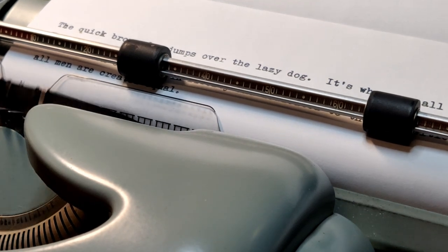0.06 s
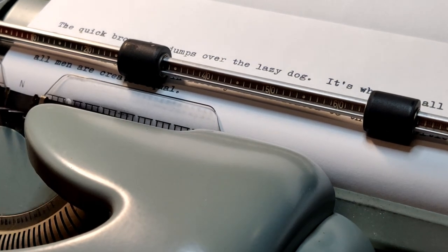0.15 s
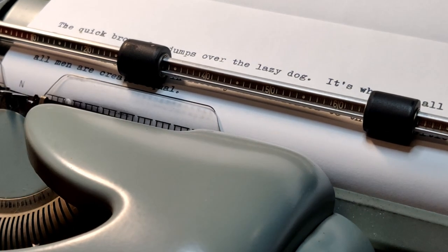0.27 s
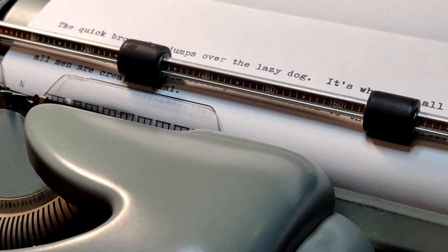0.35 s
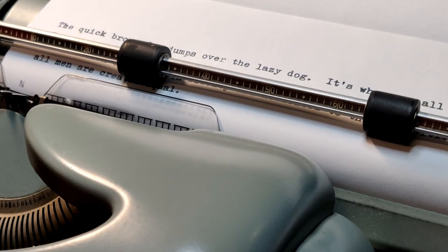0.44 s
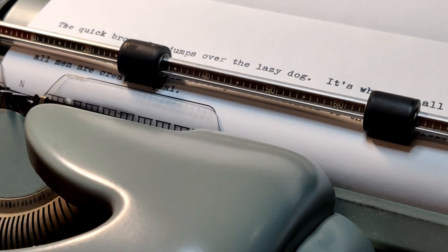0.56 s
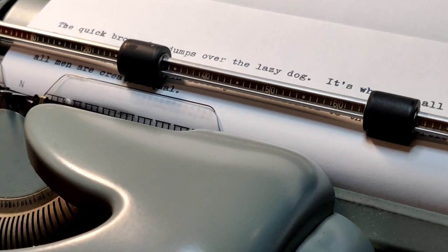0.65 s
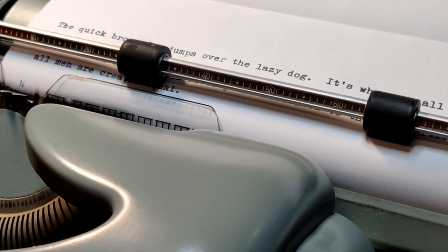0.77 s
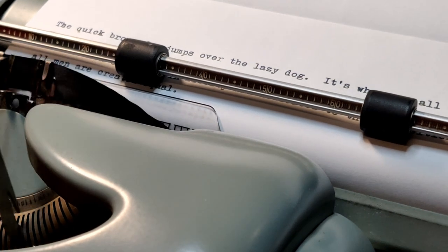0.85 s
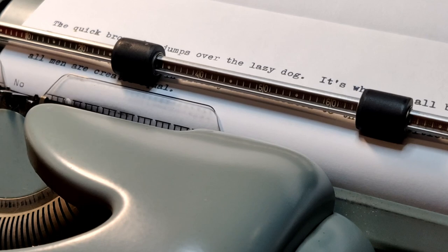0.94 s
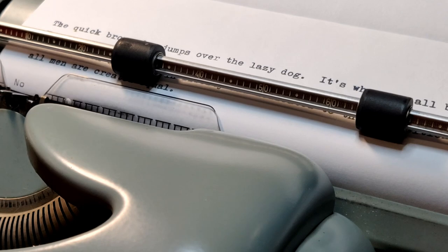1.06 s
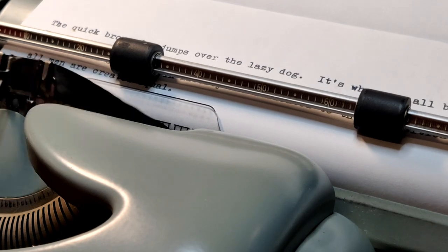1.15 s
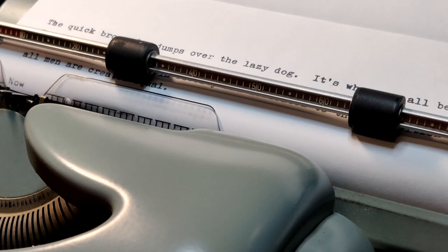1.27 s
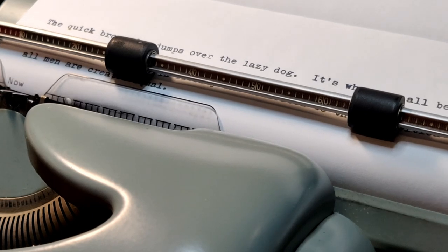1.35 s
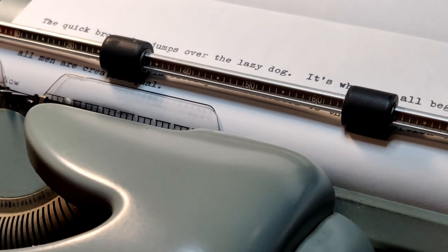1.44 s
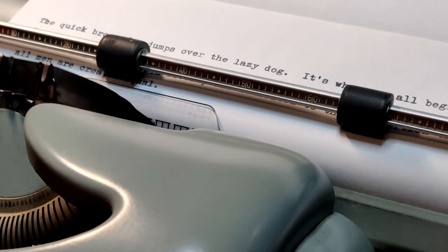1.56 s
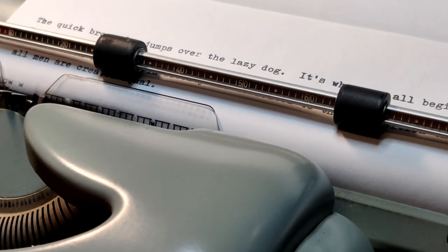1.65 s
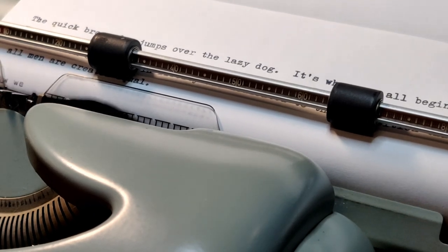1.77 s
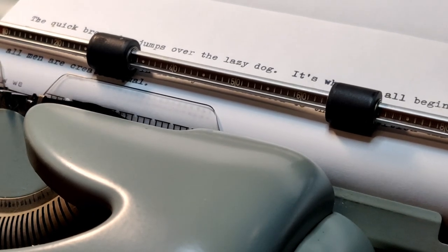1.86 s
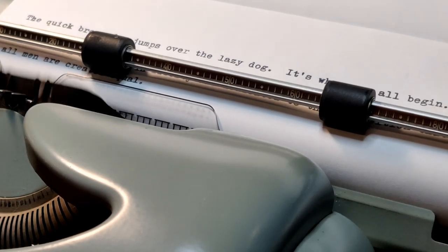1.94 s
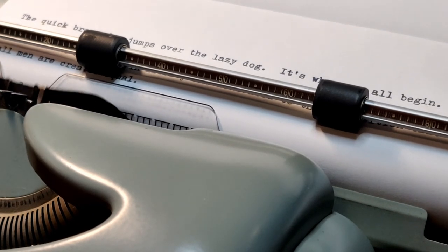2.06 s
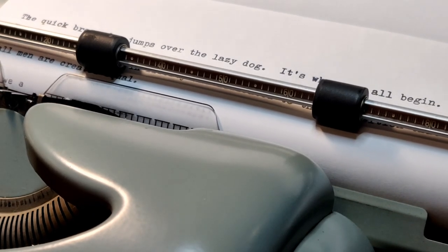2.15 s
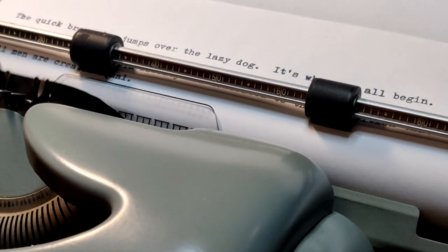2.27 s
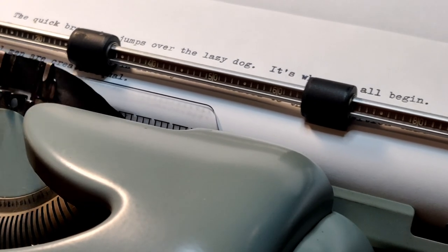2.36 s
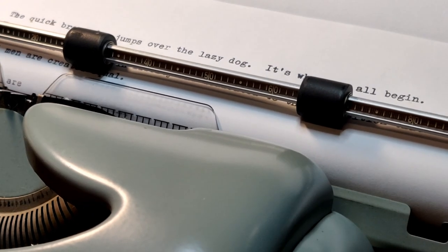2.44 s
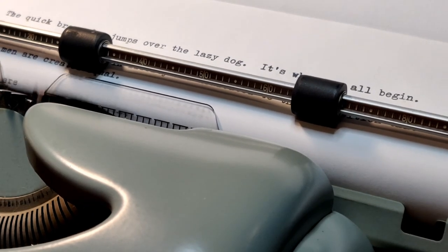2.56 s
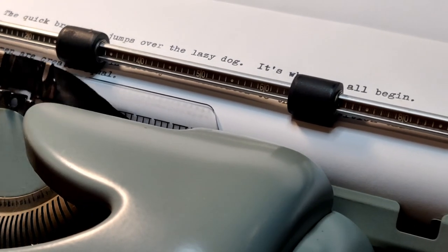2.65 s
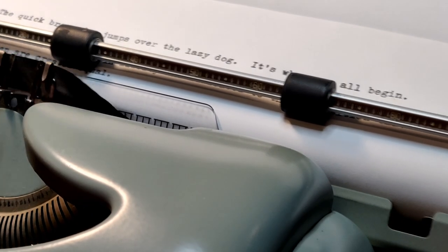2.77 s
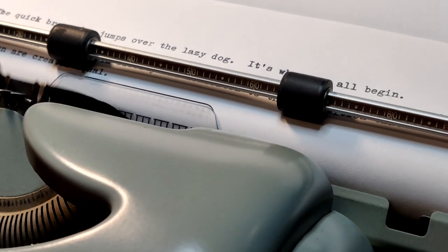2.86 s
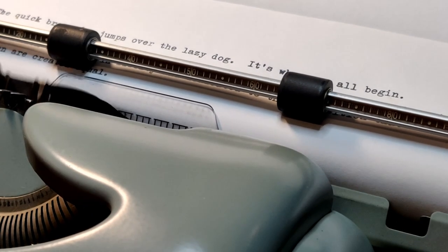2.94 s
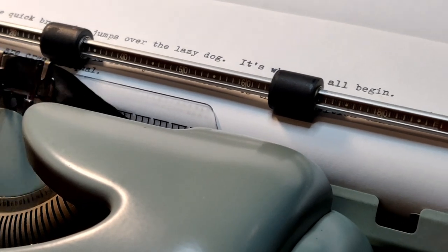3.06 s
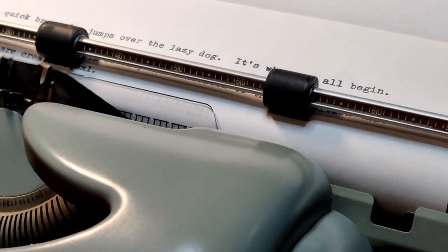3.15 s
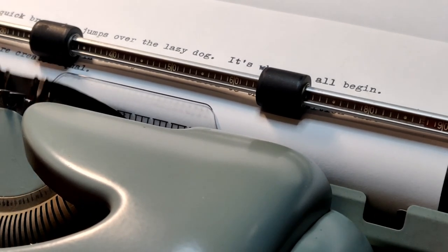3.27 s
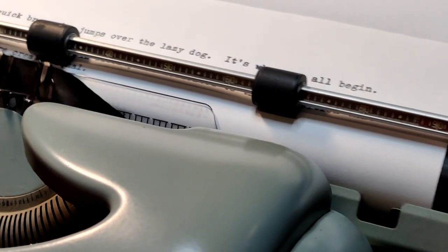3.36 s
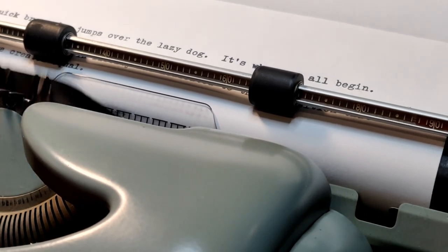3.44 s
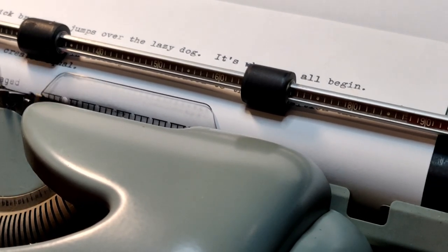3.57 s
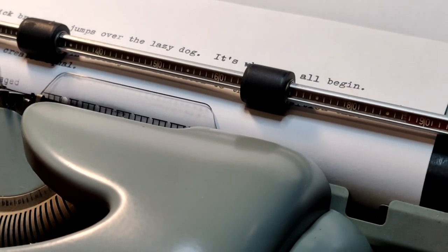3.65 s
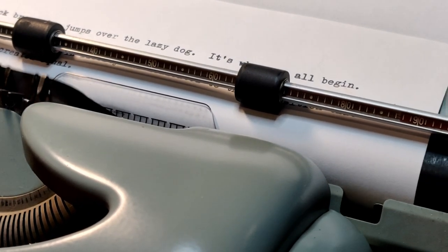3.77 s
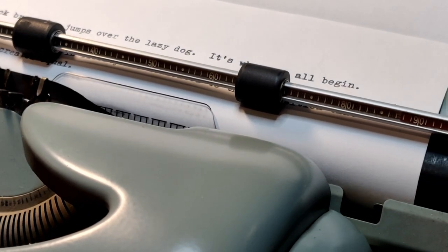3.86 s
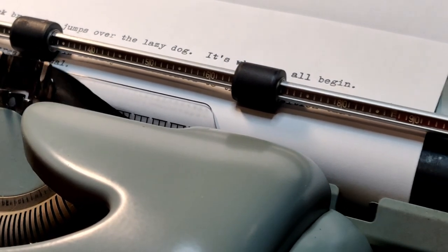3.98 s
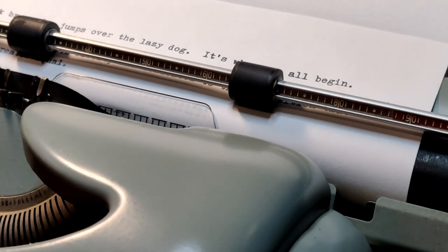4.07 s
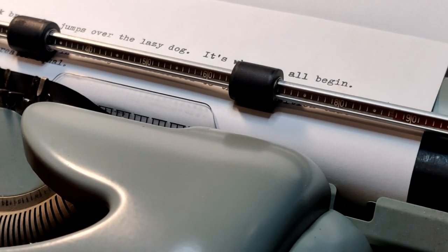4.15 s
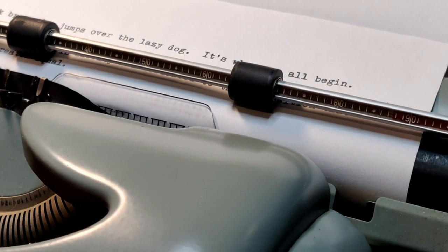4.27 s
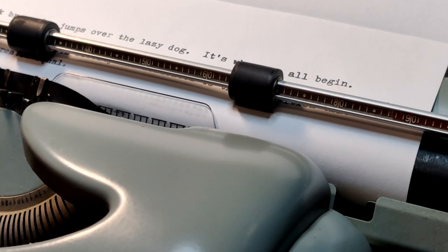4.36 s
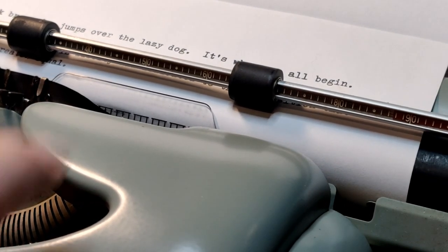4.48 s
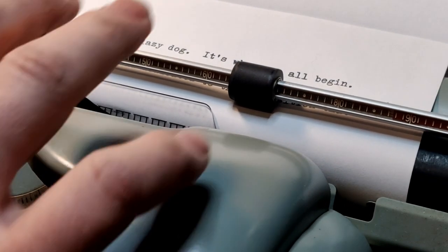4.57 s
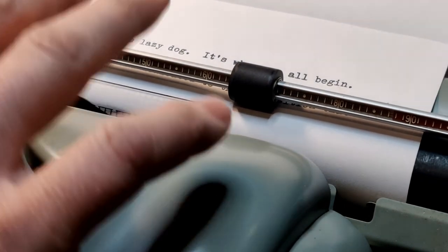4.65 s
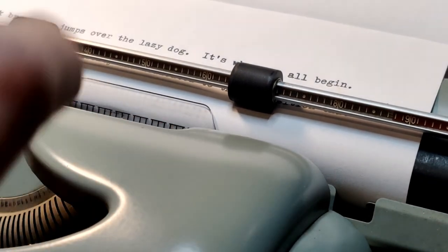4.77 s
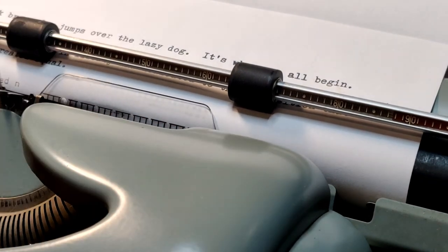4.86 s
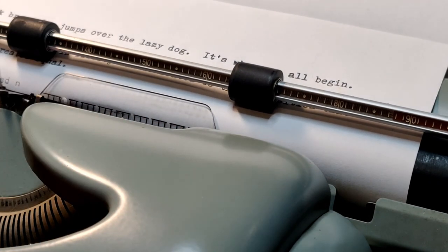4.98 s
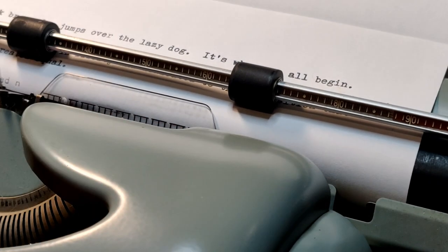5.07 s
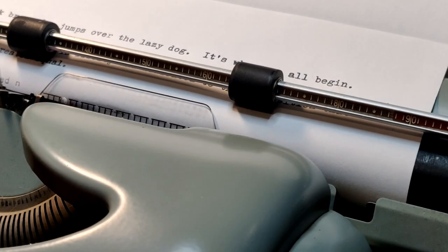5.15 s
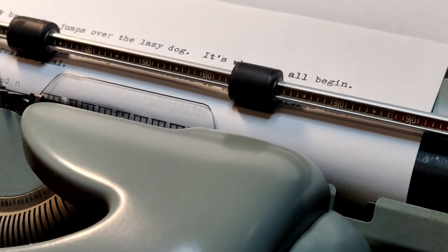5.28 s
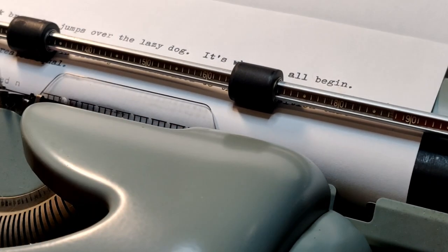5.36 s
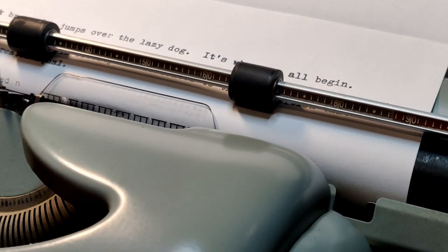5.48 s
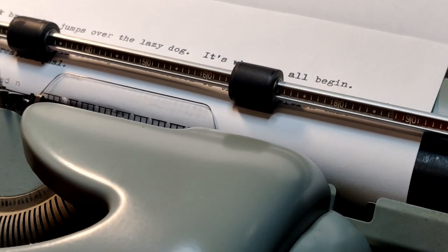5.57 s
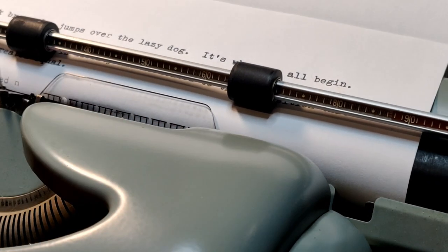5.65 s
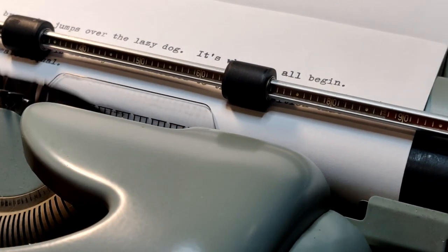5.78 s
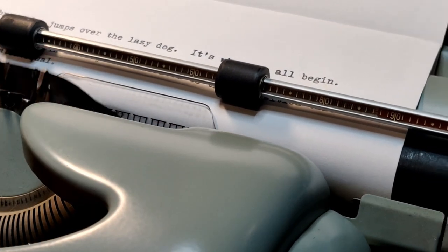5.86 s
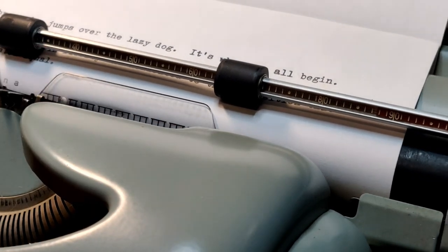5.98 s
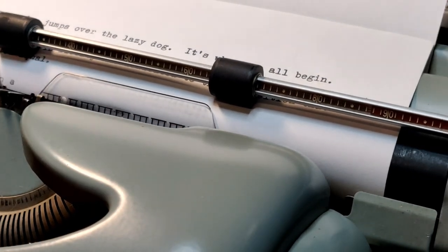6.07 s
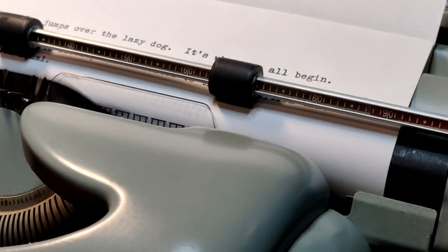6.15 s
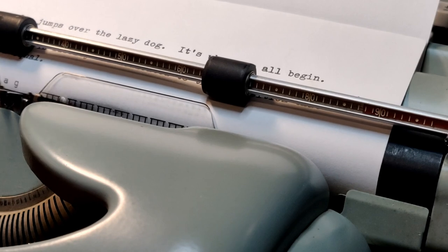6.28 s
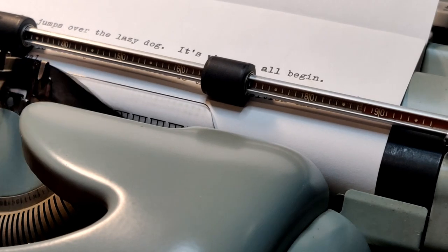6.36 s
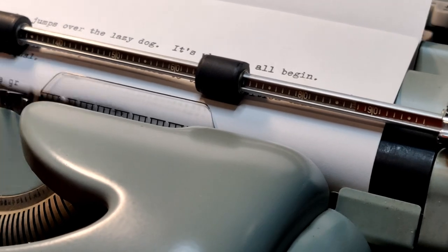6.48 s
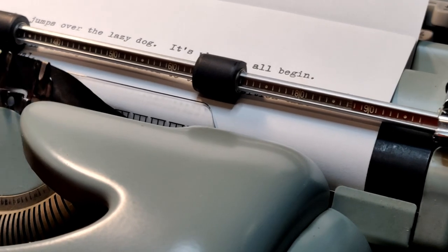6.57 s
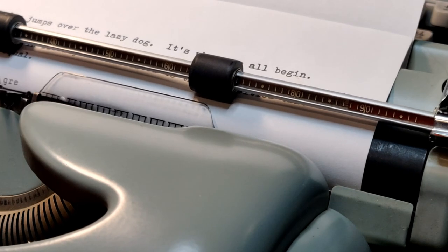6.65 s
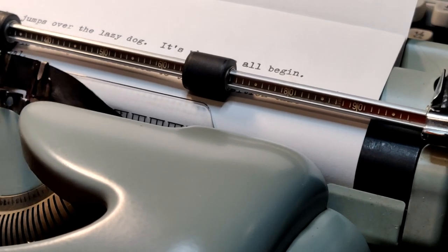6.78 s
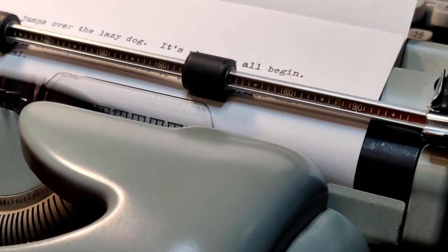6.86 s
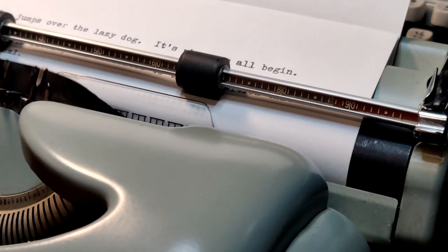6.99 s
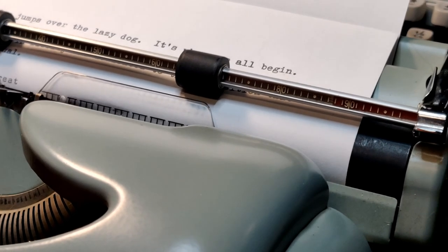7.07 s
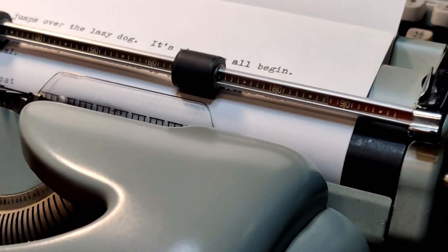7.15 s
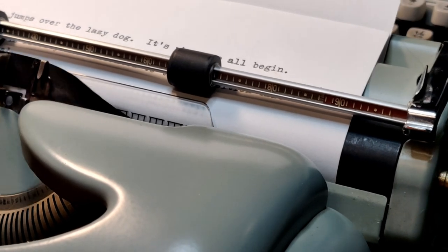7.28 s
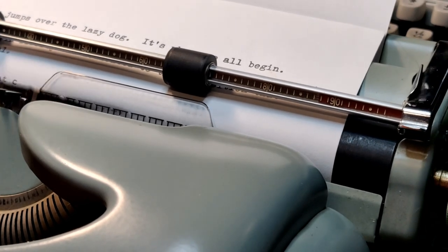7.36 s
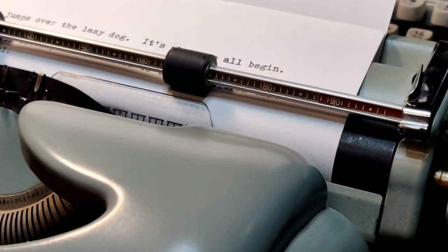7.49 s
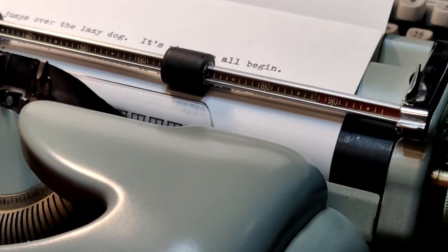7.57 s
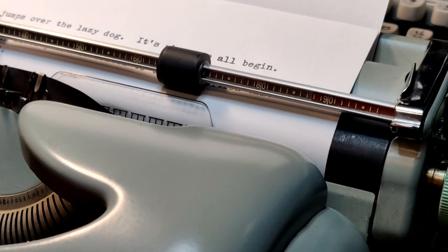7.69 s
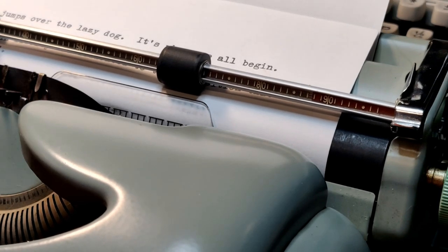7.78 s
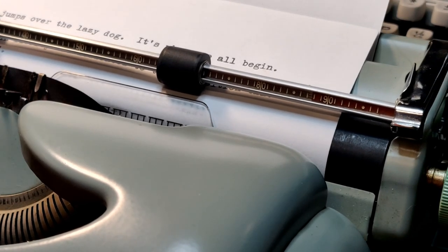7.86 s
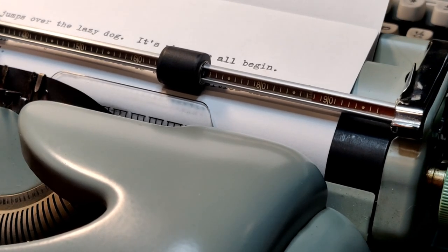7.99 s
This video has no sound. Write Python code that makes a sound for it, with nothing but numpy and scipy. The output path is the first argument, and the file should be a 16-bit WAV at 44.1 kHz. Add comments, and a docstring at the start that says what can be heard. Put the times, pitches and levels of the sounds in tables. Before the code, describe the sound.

Close up, a manual typewriter clatters in quick uneven runs of sharp metallic keystrokes, pauses briefly with small clicks, then resumes in a quiet room.

```python
"""A manual typewriter on a desk in a quiet room, with a two-port microphone close by.
From the start keys go down, type slugs slap the platen, type bars fall back and the carriage steps on;
the space bar knocks the ringing frame, linkages jingle and the desk thuds under each blow.
After four seconds typing pauses, leaving a few small clicks and a faint tone; then it resumes to the end.
Filtered noise bursts and dying sines make each blow; near surfaces, a far wall and the room answer."""
import sys
import numpy as np
from scipy import signal
from scipy.fft import rfft, irfft, next_fast_len
from scipy.io import wavfile
from scipy.ndimage import uniform_filter1d

SR = 44100
rng = np.random.default_rng(int(sys.argv[2]) if len(sys.argv) > 2 else 0)


def store_pcm(level_fs):
    """Save levels as 16-bit WAV."""
    pcm = np.round(np.clip(level_fs, -1, 1) * 32767).astype(np.int16)
    wavfile.write(sys.argv[1], SR, np.atleast_2d(pcm).T)


N = 353902  # samples

# Levels in the event tables are relative within their own sound path.
# type slugs on the platen: start_s, slap_db, jingle_db, boom_db
STRIKES = [(0.0454, -15, -16, -31.5), (0.8602, -13, -14.5, -35.5), (1.1618, -14.5, -18.5, -43),
           (1.574, -16, -21.5, -37), (1.7274, -16, -22, -43), (2.0111, -14.5, -17.5, -28),
           (2.2386, -13, -19, -41), (2.3545, -13, -18.5, -35), (2.6555, -14, -20, -47.5),
           (2.8033, -14.5, -25, -36), (3.019, -14.5, -20.5, -43), (3.1143, -16.5, -20, -32),
           (3.2454, -16, -21.5, -36.5), (3.3679, -16, -26, -43), (3.5082, -17, -22, -39),
           (3.9645, -18.5, -21, -39), (5.8464, -16, -21.5, -47), (6.2097, -15, -21, -53),
           (6.42, -15, -21, -51), (6.5761, -16, -25, -55), (6.7786, -16, -19, -41.5),
           (6.956, -15.5, -22.5, -48.5), (7.3007, -13.5, -18, -46), (7.5935, -13.5, -20, -42)]
# space bar knocks: start_s, clack_db, frame_db, jingle_db, desk_db
SPACES = [(1.3373, -15, -30, -25, -33), (1.8588, -14, -22.5, -23.5, -31), (2.4746, -14, -21.5, -19.5, -28),
          (3.6206, -14.5, -22.5, -25.5, -29), (5.652, -12, -23, -20.5, -34),
          (5.9529, -13.5, -22.5, -20.5, -31), (7.0865, -13.5, -22, -26, -34)]
# other small clicks and knocks: start_s, click_db, jingle_db, frame_db, panel_db, boom_db
CLICKS = [(0.302, -57, -48, -56, -44, -35), (0.316, -49, -30, -48, -39, -34),
          (1.322, -35, -46, -35.5, -47, -43), (2.336, -33.5, -32, -45, -48, -47),
          (3.738, -40.5, -22, -45, -46, -50), (3.955, -37.5, -22, -44, -50, -51),
          (4.6865, -59, -58, -70, -62, -62), (4.7064, -49.5, -55, -79, -60, -53),
          (4.7356, -46, -30, -47, -28, -34.5), (5.639, -46.5, -36, -42, -45, -47),
          (7.483, -59, -42, -53, -45, -47.5), (7.524, -51.5, -38, -53, -60, -43)]
# keys going down, ahead of their strikes: start_s, level_db
PRESSES = [(0.0127, -26), (0.818, -33), (1.122, -42), (1.533, -37), (1.688, -30), (1.971, -34),
           (2.192, -46), (2.62, -28.5), (2.7635, -36), (2.978, -28.5), (3.059, -34), (3.21, -37),
           (3.3255, -31), (3.927, -38), (6.172, -25.5), (6.375, -47), (6.531, -30.5), (6.739, -36.5),
           (6.9075, -38), (7.261, -28.5), (7.559, -46)]
# carriage stepping on after a strike: start_s, level_db
STEPS = [(0.105, -35), (0.931, -31), (1.255, -31.5), (1.651, -35.5), (1.795, -38), (2.079, -33.5),
         (2.306, -31.5), (2.422, -30.5), (2.724, -33.5), (2.853, -34.5), (3.067, -32.5), (3.185, -41.5),
         (3.275, -32.5), (3.405, -34), (3.578, -41), (4.045, -30.5), (5.915, -38), (6.245, -34),
         (6.49, -44.5), (6.65, -39.5), (6.827, -34.5), (7.004, -33), (7.345, -32), (7.667, -32)]
# type bars falling back on their rest: start_s, level_db
FALLS = [(0.145, -26.5), (0.995, -23.5), (1.287, -26), (1.833, -24.5), (2.148, -26), (2.46, -24),
         (2.775, -24), (2.917, -28.5), (3.346, -32), (3.447, -22.5), (3.603, -33), (4.087, -36),
         (6.324, -26.5), (6.688, -25.5), (7.074, -33), (7.418, -19), (7.715, -39.5)]
# space bar coming back up, one for each knock: start_s, level_db
RETURNS = [(1.441, -33.5), (1.974, -34.5), (2.597, -33), (3.711, -31.5), (5.7444, -31.5), (6.056, -32.5),
           (7.192, -31.5)]

# how each small move sounds, over its own level: click_db, jingle_db, frame_db, panel_db, boom_db
PRESS_VOICE = (-11.5, 4, -21, -8, -11.5)
FALL_VOICE = (-17.5, 0.5, -26.5, -9.5, -12)
STEP_VOICE = (-13.5, -21, -15.5, -1.5, 2)
RETURN_VOICE = (-18, -2.5, -7, -8, -6)
# the ribbon lifting just ahead of the slug, over the slap: same columns
LIFT_VOICE = (-21.5, -10.5, -31, -44, -43.5)
# the returned space bar landing again, over the return: same columns
SETTLE_VOICE = (-30, -9, -21, 1, -4.5)
LIFT_LEAD_S, SETTLE_LAG_S = .011, .022

# spectrum of a slug's slap: pitch_hz, relative level_db (per hertz)
SLAP_SPECTRUM = [(290, -28), (600, -11.5), (1200, -13), (2200, -0.5), (3300, -8), (5200, -3.5), (7300, -9),
                 (9000, -5.5), (12000, -14), (16000, -31)]
# spectrum of the space bar's clack: pitch_hz, relative level_db (per hertz)
CLACK_SPECTRUM = [(760, -18), (1300, 6.5), (1890, -7), (2920, -1), (3970, -7), (5550, -3.5), (6030, 2),
                  (7260, -16), (12000, -14), (15600, -46.5), (22000, -120)]
# spectrum of clicking steel: pitch_hz, relative level_db (per hertz)
STEEL_SPECTRUM = [(760, -14), (1300, -12), (1730, -5.5), (2890, -3), (3360, -1.5), (5290, -4.5), (6200, 4),
                  (7060, -7), (12000, -6.5), (15600, -36.5), (22000, -120)]
# spectrum of jingling parts: pitch_hz, relative level_db (per hertz)
JINGLE_SPECTRUM = [(9000, -42), (11000, -27.5), (13000, -3.5), (14500, -1.5), (16200, 2.5)]
# ringing frame, undamped: pitch_hz, relative level_db, t60_s
FRAME_MODES = [(455, -20, 0.5), (518.4, 0.5, 0.098), (762, -1, 0.038), (822, -1, 0.11), (945, -9.5, 0.17),
               (1095, 3, 0.062), (1345, -10, 0.056), (1607, -10.5, 0.1), (1930, -13.5, 0.17)]
# ringing desk panel: pitch_hz, relative level_db, t60_s
PANEL_MODES = [(196, -14.5, 0.18), (228.5, 1.5, 0.11), (243.6, -3.5, 0.19), (306, -7, 0.1)]
# low boom of the desk: pitch_hz, relative level_db, t60_s
BOOM_MODES = [(56, -17, 0.099), (79.9, -4.5, 0.063), (86, 8, 0.23), (92.8, 11.5, 0.19), (130, -10, 0.15)]
# carriage parts that sing as the space bar returns: pitch_hz, width_hz, relative level_db
CARRIAGE_MODES = [(3900, 74, -18), (4680, 36, -12.5), (5620, 42, 2), (6880, 87, -23.5), (8900, 32, -8.5),
                  (9820, 180, -1), (10500, 61, 4), (13400, 140, -6), (14000, 85, -24.5), (14300, 110, -9),
                  (15100, 36, -1.5), (15600, 530, -8)]

# Linkage rattle levels, each as steel_db, jingle_db:
# type bar rising
SWINGING = (-52, -44)
# key held down
HELD = (-51.5, -44.5)
# type bar fallen back, over its share of the fall's level
FALLEN = (-35, -27.5)
# space bar down
SPACED = (-54.5, -58)
# carriage sliding on after the space bar
STEPPING = (-51.5, -48)
# after one of the other small clicks, over its click and jingle
NUDGED = (-9, -13.5)
# decay of the rattle: steel t60_s, jingle t60_s
RATTLE_T60 = 0.28, .2
SWING_S, HOLD_S, SLIDE_S = .04, .077, .12  # key down to strike; strike to key release; carriage slide
FALL_SHARE = .61  # dB of rattle for each dB of a harder fall

# reflections from close surfaces: delay_s of each
ECHO_DELAYS = .00319, .00377, .00434
# the same reflections: left gain, right gain
ECHO_GAINS = [(-.2, -.1), (.85, .7), (0, -.2)]
FAR_WALL_DELAY_S, FAR_WALL_DB = .0362, -16
# room tail by band: pitch_hz, t60_s, level_db
ROOM_BANDS = [(100, .25, -14), (300, .22, -12), (600, .2, -17), (1300, .18, -2), (5000, .15, -1.5),
              (9000, .12, -1.5), (15000, .1, -10)]

# faint tone: start_s, level_db before wavering
WHINE_LEVEL = [(3.6, -93), (4.1, -77.5), (5.7, -78.5), (6.2, -88)]
# spectrum of the steady room noise: pitch_hz, relative level_db (per hertz)
FLOOR_SPECTRUM = [(25, 7), (70, 4.5), (156, -11.5), (334, -8.5), (404, -22), (900, -21), (1400, -24),
                  (4700, -31), (9000, -33), (12500, -26.5), (15500, -26.5), (17000, -41)]
FLOOR_DB = -57.5
# likeness of the noise at the two ports: pitch_hz, left-right likeness (0 to 1)
FLOOR_LIKENESS = [(60, 0.3), (240, 0.19), (950, 0.24), (3770, 0.31), (15000, 0.087)]
# humming bands in the room noise: pitch_hz, width_hz, level_db
HUM_BANDS = [(236, 14, -73.5), (520, 92, -76.5), (770, 60, -85.5)]

# microphone ports, level difference: pitch_hz, left minus right level_db
PORT_LEVELS = [(60, 1.5), (270, 3.5), (450, .6), (3300, 1.1), (5500, 2.8), (9080, -7), (15000, -3)]
# microphone ports, phase difference: pitch_hz, left lead in radians
PORT_PHASES = [(860, 0), (1550, .6), (2410, -.1), (4480, .1), (5600, -.8), (6550, .7), (7920, .1),
               (9040, -4.4), (9560, -6.2), (11500, -12.6), (17300, -12.5)]


def machine():
    """Sums the metal parts: slug, space bar, linkage, carriage and frame."""
    small = moves()
    blows_heard = type_slap() + space_clack() + steel_clicks(small)
    return blows_heard + jingle(small) + frame(small) + carriage_song()


def type_slap():
    """One hard contact of slug on platen, with chatter and a brief noisy shiver around it."""
    start, slap_db, _, _ = np.transpose(STRIKES)
    contact = pushes(start, gain_of(slap_db + 8))
    chatter = blows(start + .0003, slap_db - 5, rise=1e-4, t60=.005) * rng.choice([-1., 1.], N)
    shiver = blows(start, slap_db - 14, rise=.0033, t60=.036) * grit(1.5, .0002)
    return through(contact + chatter + shiver, colour(SLAP_SPECTRUM))


def space_clack():
    """The space bar clacks: a burst of many uneven contacts."""
    start, clack_db = np.transpose(SPACES)[:2]
    burst = blows(start + .0011, clack_db - 8, rise=.00053, t60=.071) * grit(4.5, .00065)
    return through(burst, colour(CLACK_SPECTRUM))


def steel_clicks(small):
    """Small moves click on steel, and the loose linkage breaks up into separate small ticks."""
    clicks = blows(small[0] + .00084, small[1], rise=.0023, t60=.043) * grit(4.5, .0013)
    ticks = rattle(column=1) * grit(4, .003)
    return through(clicks + ticks, colour(STEEL_SPECTRUM))


def jingle(small):
    """Light parts jingle high up after every blow and while the linkage rattles."""
    hit, bar = np.transpose(STRIKES), np.transpose(SPACES)
    level = blows(hit[0] + .0013, hit[2], rise=.0028, t60=.074)
    level += blows(bar[0] + .003, bar[3], rise=.002, t60=.045)
    level += blows(small[0] + .00088, small[2], rise=.00054, t60=.028)
    noise = level * grit(4.5, .0041) + rattle(column=2) * grit(2.9, .002)
    return through(noise, colour(JINGLE_SPECTRUM))


def frame(small):
    """The space bar lets the frame ring; lighter blows land on held parts and damp it."""
    hit, bar = np.transpose(STRIKES), np.transpose(SPACES)
    knock = through(pushes(bar[0], gain_of(bar[2] + 22.5)), rings(FRAME_MODES, rise=.0074))
    taps = blows(hit[0], -38, rise=.00033, t60=.051)
    taps += blows(small[0] + .00067, small[3], rise=.00053, t60=.13)
    taps += blows(bar[0] + .00071, bar[2] - 6, rise=.002, t60=.18)
    taps += gain_of(2.5) * rattle(column=1)
    return knock + through(taps * grit(3.9, .0036), rings(FRAME_MODES, damping=5.7))


def carriage_song():
    """The bar returns and the carriage slides on: gritty noise sets its parts singing."""
    drive = blows(np.transpose(RETURNS)[0], -46.5, rise=.002, t60=.4) * grit(4.5, .0044)
    # a resonance of this width in Hz dies by 60 dB in ln(1000) / (pi * width) seconds
    modes = [(hz, db, np.log(1000) / np.pi / width) for hz, width, db in CARRIAGE_MODES]
    return through(drive, rings(modes))


def moves():
    """Small moves of both cycles and other clicks: start_s, click, jingle, frame, panel, boom dB."""
    hit, back = np.array(STRIKES)[:, :2], np.array(RETURNS)
    cycle = [(PRESSES, PRESS_VOICE), (hit - [LIFT_LEAD_S, 0], LIFT_VOICE), (STEPS, STEP_VOICE),
             (FALLS, FALL_VOICE), (back, RETURN_VOICE), (back + [SETTLE_LAG_S, 0], SETTLE_VOICE)]
    rows = [[s, *np.add(db, voice)] for table, voice in cycle for s, db in table]
    return np.vstack([rows, CLICKS]).T


def rattle(column):
    """Level of the linkage rattle, in uneven clumps, while a part moves and after; 1 steel, 2 jingle."""
    press, hit, fall, bar, back = (np.transpose(rows)[0] for rows in (PRESSES, STRIKES, FALLS, SPACES, RETURNS))
    other, k = np.transpose(CLICKS), column - 1
    fall_db = FALLEN[k] + FALL_SHARE * np.transpose(FALLS)[1]
    # start, end of the movement, level
    spans = [(press, press + SWING_S, SWINGING[k]),
             (hit, hit + HOLD_S, HELD[k]),
             (fall, fall, fall_db),
             (bar, back, SPACED[k]),
             (back, back + SLIDE_S, STEPPING[k]),
             (other[0], other[0], other[column] + NUDGED[k])]
    start, end, db = np.hstack([np.broadcast_arrays(*span) for span in spans])[..., None]
    t = np.arange(0, N / SR + .01, .001)
    decayed_db = db - 60 * np.maximum(t - end, 0) / RATTLE_T60[k]
    level = (gain_of(decayed_db) * (t > start)).max(axis=0)  # the loudest movement wins
    clumps = evened(uniform_filter1d(uniform_filter1d(rng.standard_normal(N), 300), 300))
    return np.interp(np.arange(N) / SR, t, level) * gain_of(2.2 * clumps)


def desk():
    """Each blow and its smaller rebound of either sign ring the desk panel and its boom."""
    hit, bar, small = np.transpose(STRIKES), np.transpose(SPACES), moves()
    start = np.r_[hit[0], bar[0], small[0]] + .0028  # the desk lags the metal
    panel_db = np.r_[np.full(len(STRIKES), -29.5), bar[4], small[4]]
    boom_db = np.r_[hit[3], bar[4], small[5]]
    late, sign = rng.random((len(start), 2)).T
    rebound = start + .0065 + .0221 * late
    thud = np.zeros(N)
    for db, modes, push_s in ((panel_db + 27, PANEL_MODES, .003), (boom_db + 29, BOOM_MODES, .008)):
        drive = pushes(start, gain_of(db)) + pushes(rebound, gain_of(db - 5) * (2 * sign - 1))
        soft = np.hanning(round(push_s * SR))  # the push is spread out, not instant
        thud += through(through(drive, soft / soft.sum()), rings(modes, rise=.0034))
    # the feet shake the desk a little for as long as the linkage moves
    shake = rattle(column=1) * rng.standard_normal(N)
    shaken_panel = gain_of(7) * through(shake, rings(PANEL_MODES))
    shaken_boom = gain_of(5.5) * through(shake, rings(BOOM_MODES))
    return thud + shaken_panel + shaken_boom


def echoes(x):
    """Direct sound, hard reflections close by, and a thin scattered one from the far wall."""
    taps = np.zeros((2, 2048))
    taps[:, 0] = 1
    taps[:, np.round(np.array(ECHO_DELAYS) * SR).astype(int)] = np.transpose(ECHO_GAINS)
    at, t = round(FAR_WALL_DELAY_S * SR), np.arange(128) / SR
    # the difference of smoothed noise thins out the bass
    scatter = np.diff(uniform_filter1d(rng.standard_normal(129), 3)) * np.exp(-t / .0003)
    taps[:, at:at + 128] = gain_of(FAR_WALL_DB) * scatter / np.linalg.norm(scatter)
    return through(x[None], taps)


def room(x):
    """Sparse taps of random sign, each band with its own decay and strength, other taps per side."""
    size, gap = SR // 2, 20  # samples
    taps = np.zeros((2, size))
    at = np.arange(100, size - gap, gap)
    at = at + rng.integers(0, gap, (2, len(at)))
    np.put_along_axis(taps, at, rng.choice([-1., 1.], at.shape), 1)
    hz, t, bands = signal.stft(taps, SR, nperseg=256)
    t60 = read(ROOM_BANDS, hz)[:, None]
    level_db = read(ROOM_BANDS, hz, column=2)[:, None]
    tail_energy = t60 * SR / gap / np.log(1e6)  # so that a long decay is not louder in itself
    bands = bands * gain_of(level_db - 60 * t / t60) / np.sqrt(tail_energy)
    return through(x[None], signal.istft(bands, SR, nperseg=256)[1])


def whine():
    """A faint sine, strongest in the pause, its pitch and level wavering slowly."""
    waver = evened(uniform_filter1d(uniform_filter1d(rng.standard_normal((2, N)), 3000), 3000))
    turns = np.cumsum(1120 + 2.2 * waver[0]) / SR  # pitch in Hz, summed to cycles
    level_db = np.interp(np.arange(N) / SR, *np.transpose(WHINE_LEVEL)) + 2.5 * waver[1]
    return np.sqrt(2) * gain_of(level_db) * np.sin(2 * np.pi * turns)


def floor():
    """Room noise with faint humming bands, partly alike at both ports, uneven in soft patches."""
    frames, hz = N // 512 + 5, np.fft.rfftfreq(2048, 1 / SR)
    a, b, c, d, patches = rng.standard_normal((frames, 1025, 5)).T
    patches = evened(uniform_filter1d(uniform_filter1d(patches, 20, 0), 6, 1))
    same = read(FLOOR_LIKENESS, hz)[:, None]
    left = a + 1j * b
    right = same * left + np.sqrt(1 - same ** 2) * (c + 1j * d)
    wide = gain_of(read(FLOOR_SPECTRUM, hz))
    shape = gain_of(FLOOR_DB) * wide / np.linalg.norm(wide)
    for centre, width, db in HUM_BANDS:
        peak = 1 / np.hypot(1, 2 * (hz - centre) / width) ** 2
        shape = shape + gain_of(db) * peak / np.linalg.norm(peak)
    # level of the unshaped noise, so that the dB settings hold
    unit = np.std(signal.istft(left, nperseg=2048, noverlap=1536)[1]) / np.sqrt(len(hz))
    shaped = np.array([left, right]) * shape[:, None] * gain_of(.5 * patches)
    return signal.istft(shaped, nperseg=2048, noverlap=1536)[1][:, :N] / unit


def gain_of(db):
    """Decibels to gain."""
    return 10 ** (np.asarray(db) / 20)


def evened(x):
    """Scales to rms 1."""
    return x / np.sqrt(np.mean(x ** 2) + 1e-20)


def read(points, hz, column=1):
    """Reads a table on a log-frequency axis."""
    table = np.transpose(points)
    return np.interp(np.log(hz + 1), np.log(table[0] + 1), table[column])


def colour(points):
    """Causal filter of energy 1 with the given spectrum (minimum phase)."""
    level_db = np.maximum(read(points, abs(np.fft.fftfreq(2048, 1 / SR))), -100)
    log_gain = np.log(gain_of(level_db))
    # the Hilbert transform of the log gain is the minimum phase
    taps = np.fft.ifft(np.exp(np.conj(signal.hilbert(log_gain)))).real[:1024]
    return taps / np.linalg.norm(taps)


def rings(modes, damping=1, rise=1e-4):
    """Sum of dying sines that build up within rise seconds, energy 1; damping shortens every ring."""
    t = np.arange(SR // 3) / SR
    taps = sum(gain_of(db - 60 * damping * t / t60) * np.sin(2 * np.pi * hz * t) for hz, db, t60 in modes)
    taps = taps * (1 - np.exp(-t / rise))
    return taps / np.linalg.norm(taps)


def pushes(times, sizes):
    """Single impulses."""
    out = np.zeros(N)
    np.add.at(out, np.round(times * SR).astype(int), sizes)
    return out


def blows(times, levels_db, rise, t60):
    """Envelope that swells up to each time, then dies at the t60 rate and is cut after about 0.2 s."""
    lead = 1500  # samples ahead of each blow
    out, t = np.zeros(N + SR), np.arange(-lead, 9000) / SR
    for s, db in np.broadcast(times, levels_db):
        at = round(s * SR)
        swell = np.exp(np.minimum(t, 0) / rise)
        out[at:at + len(t)] += gain_of(db - 60 * np.maximum(t, 0) / t60) * swell
    return out[lead:N + lead]


def grit(lumpy_db, grain):
    """Noise whose level wanders by lumpy_db (rms) over grain seconds: many tiny metal contacts."""
    lumps = evened(uniform_filter1d(rng.standard_normal(N), round(grain * SR)))
    return evened(rng.standard_normal(N) * gain_of(lumpy_db * lumps))


def through(x, taps):
    """Convolves and keeps the length."""
    return signal.oaconvolve(x, taps, axes=-1)[..., :N]


def scene():
    """Machine with its reflections, desk, room tail, faint tone and floor."""
    metal, wood = machine(), desk()
    return echoes(metal) + wood + room(metal + wood) + whine() + floor()


def record(dry):
    """The two ports differ in level and phase by frequency; then bass roll-off and band limit."""
    size = next_fast_len(N + 4096)
    hz = np.fft.rfftfreq(size, 1 / SR)
    ratio = hz / 55  # corner of the bass roll-off at 55 Hz
    bass = (1j * ratio) ** 2 / (1 + 1.3j * ratio - ratio ** 2)
    half = gain_of(read(PORT_LEVELS, hz) / 2)  # each port takes half the difference
    ports = np.array([half * np.exp(1j * read(PORT_PHASES, hz)), 1 / half])
    heard = irfft(rfft(dry, size) * ports * bass, size)[:, :N]
    band_limit = signal.firwin(301, 16500, window=("kaiser", 9), fs=SR)  # Hz
    return signal.oaconvolve(heard, band_limit[None], "same")


dry = scene()
out = record(dry)
store_pcm(out)
```